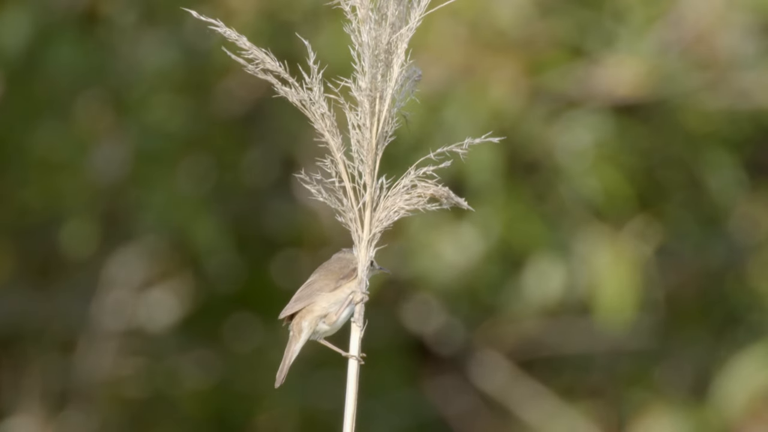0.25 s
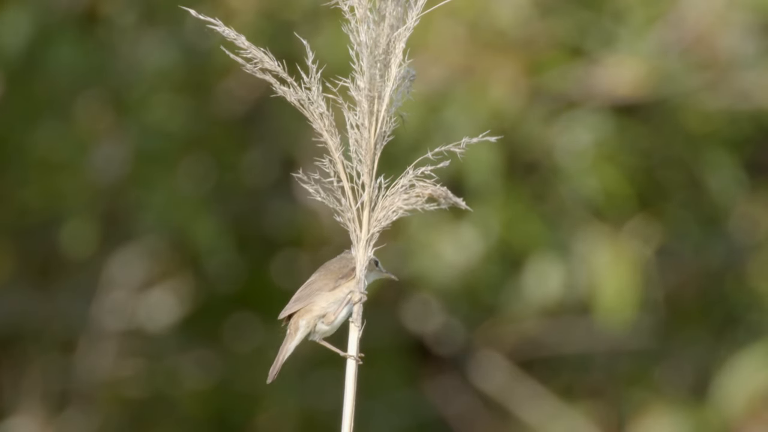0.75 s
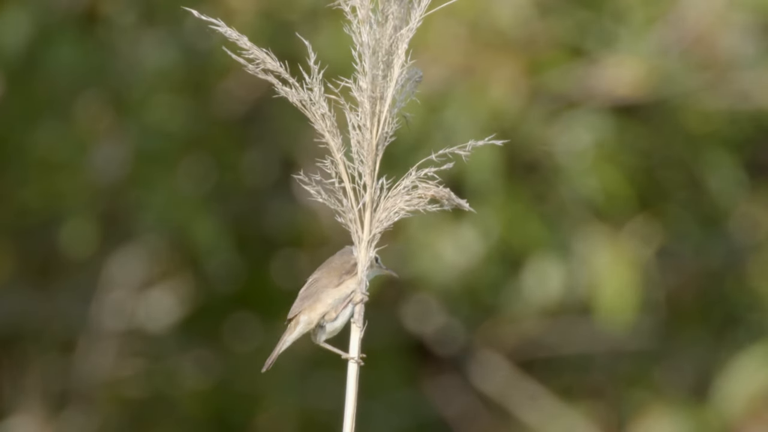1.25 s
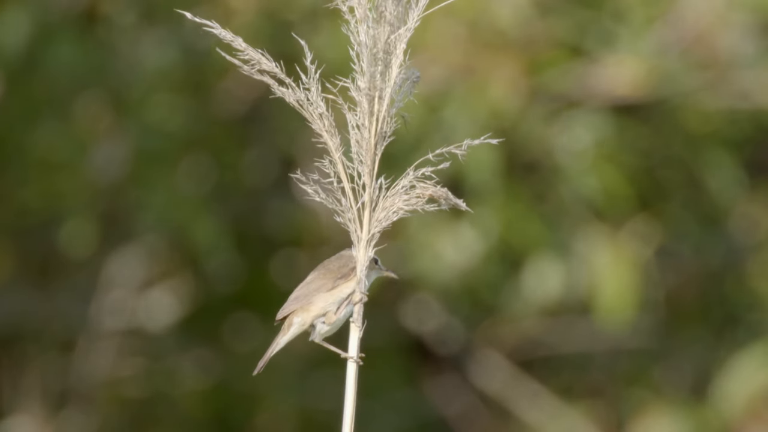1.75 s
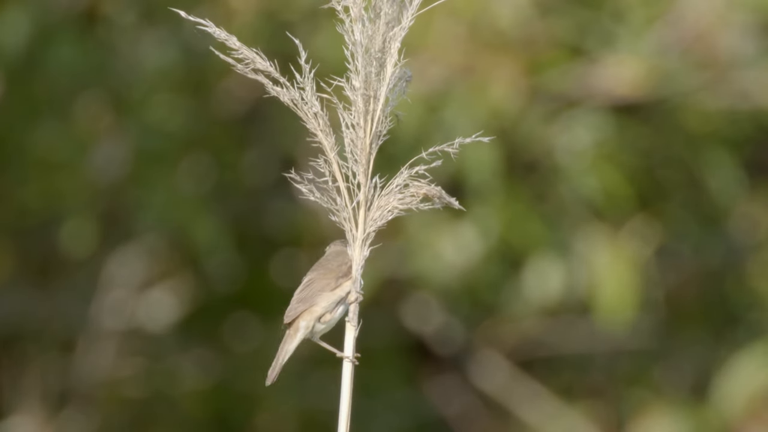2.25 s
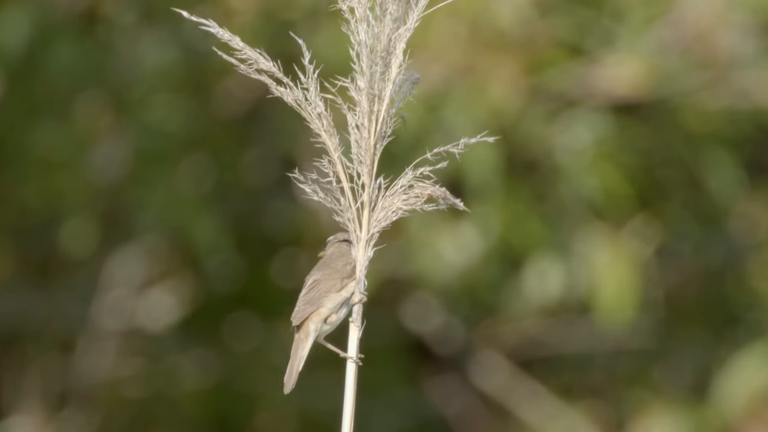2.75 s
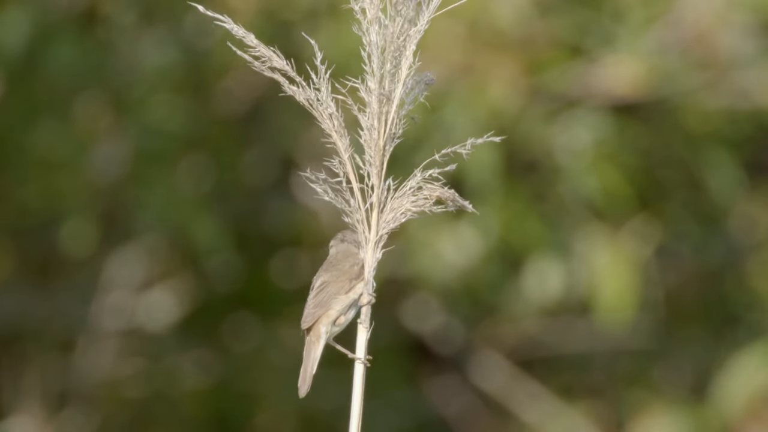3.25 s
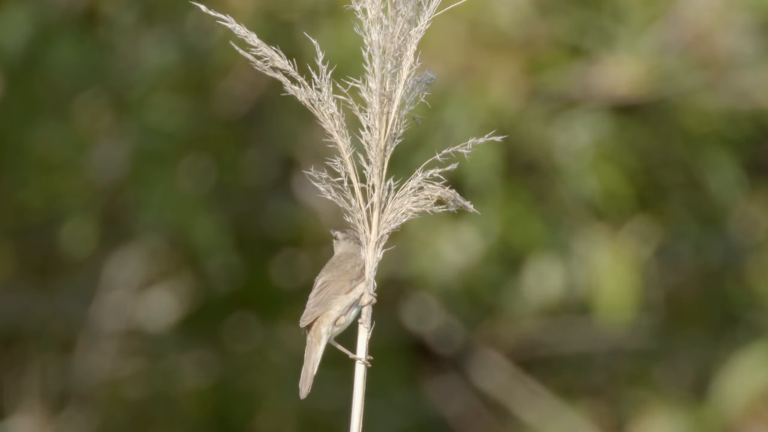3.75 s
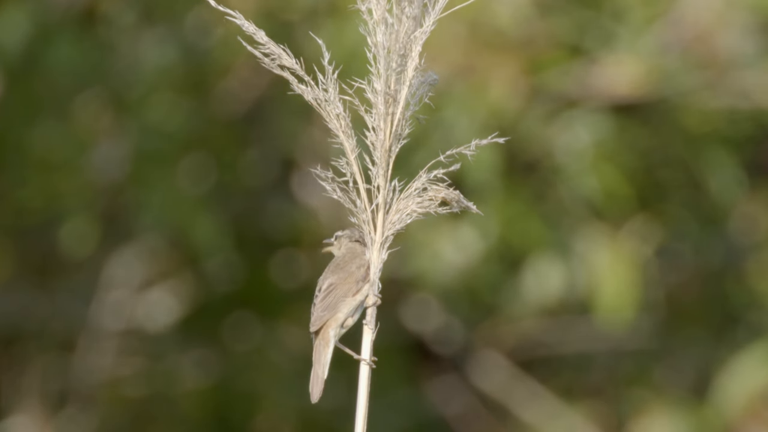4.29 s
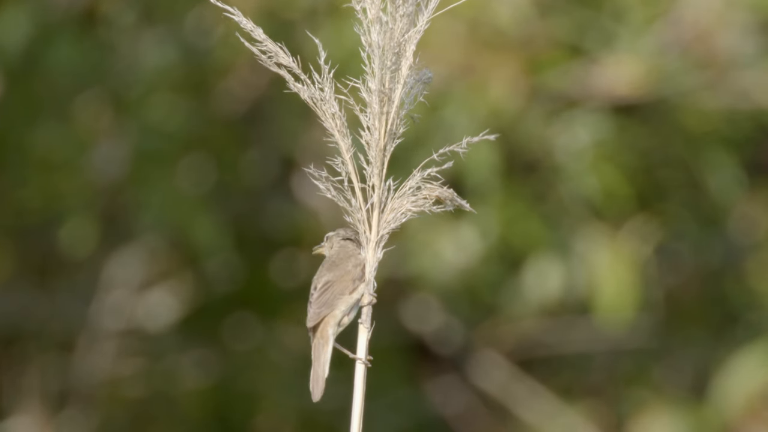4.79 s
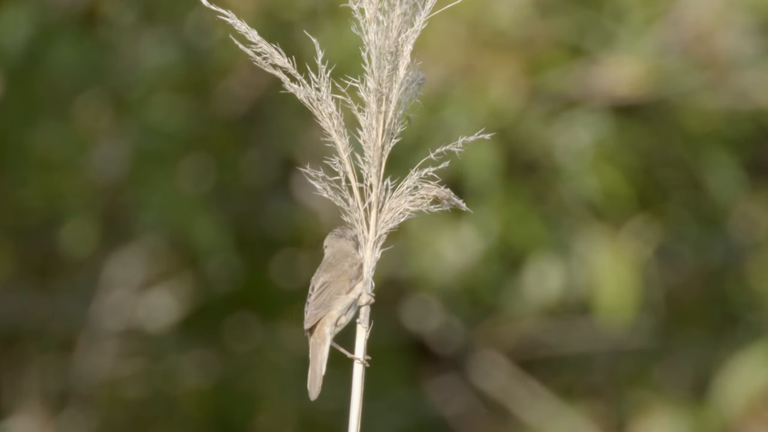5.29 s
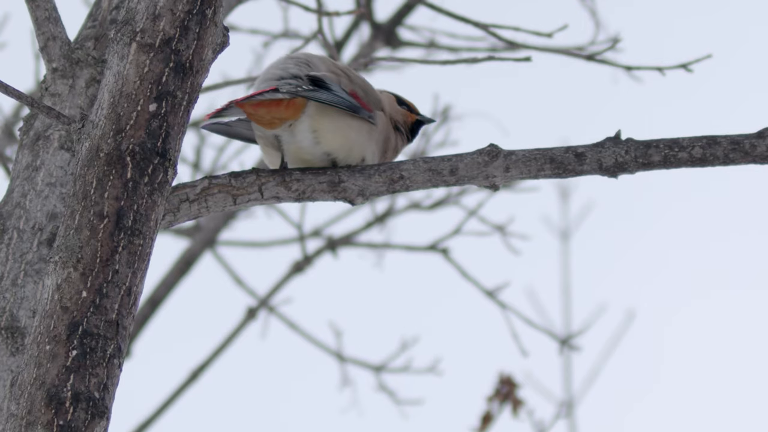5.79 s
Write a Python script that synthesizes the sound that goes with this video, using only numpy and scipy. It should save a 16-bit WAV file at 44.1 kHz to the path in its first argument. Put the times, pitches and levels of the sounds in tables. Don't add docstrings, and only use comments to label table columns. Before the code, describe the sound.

Outdoors in a reed bed, steady leafy hiss and faint throbbing insects lie under distant ticking, chattering birds. A close small bird warms up with soft arched notes, then sings short high paired chips. A far whistler swells a long low tone, flourishes and dives amid sharp tweets. Loud falling slurs follow in an even run, echoing off the foliage. At the very end it cuts to a quieter wood with a faint level whistle.

```python
import sys
import numpy as np
from scipy import signal
from scipy.fft import rfft, irfft
from scipy.io import wavfile
from scipy.ndimage import uniform_filter1d, minimum_filter1d

SR = 44100
rng = np.random.default_rng(int(sys.argv[2]) if len(sys.argv) > 2 else 0)


def transcribe(u):
    v = np.clip(np.atleast_2d(u).T, -1, 1)
    q = np.round(v * 32767).astype(np.int16)
    wavfile.write(sys.argv[1], SR, q)


def boost(x):
    u = np.asarray(x, float) / 20
    return 10 ** u


N = 265967
CUT_S = 5.703


def rms_one(x):
    return x / np.sqrt(np.mean(x ** 2) + 1e-20)


def drift(rate_hz):
    r = np.exp(-2 * np.pi * rate_hz / SR)
    wander = signal.lfilter([1], [1, -2 * r, r * r], rng.standard_normal(N + SR))
    return rms_one(wander[SR:])


def swell(t, start_s, length_s):
    return np.sin(np.pi * np.clip((t - start_s) / length_s, 0, 1))


def resonate(x, hz, width_hz):
    r = np.exp(-np.pi * width_hz / SR)
    feed = np.array([1, 0, -1]) * (1 - r * r) / 2
    return signal.lfilter(feed, [1, -2 * r * np.cos(2 * np.pi * hz / SR), r * r], x)


def add(out, start_s, hz, gain):
    turn = 2 * np.pi * np.cumsum(hz) / SR
    at = max(round(start_s * SR), 0)
    tone = np.sqrt(2) * gain * (np.sin(turn) + boost(-52.5) * np.sin(2 * turn))
    out[at:at + len(hz)] += tone[:N - at]


def sing(notes):
    out = np.zeros(N)
    for rows in notes:
        s, hz, level_db = np.transpose(rows)
        s = np.sort(s)
        t = np.arange(s[0], s[-1], 1 / SR)
        fade = np.clip(np.minimum(t - s[0], s[-1] - t) / 0.0034, 0, 1)
        pitch = uniform_filter1d(np.interp(t, s, hz), size=60)
        gain = uniform_filter1d(boost(np.interp(t, s, level_db)), size=40)
        add(out, s[0], pitch, fade * gain)
    return out


def repeat(calls, shape, vary_db):
    ms, share, shape_db = np.transpose(shape)
    vary = rng.standard_normal((len(calls), len(ms)))
    notes = []
    for (s, db, top_hz, *stretch), v in zip(calls, vary):
        times = s + ms * np.prod(stretch) / 1000
        notes.append(np.transpose([times, top_hz * share, db + shape_db + vary_db * v]))
    return sing(notes)


def pulsed(pulses, end_ms, glide, gap_db=-15):
    rows, ends = [], [p[0] for p in pulses[1:]] + [end_ms]
    for (start, peak, db), end in zip(pulses, ends):
        rise = [(start, u) for u in (0, .15, .4, .75, 1)]
        for edge, u in rise + [(end, .5)]:
            pulse_db = db + 20 * np.log10(np.sin(u * np.pi / 2) + 1e-3)
            rows.append((edge + u * (peak - edge), max(pulse_db, gap_db + db / 2)))
    ms, db = np.transpose([(rows[0][0] - 1, -34)] + rows + [(end_ms, -34)])
    return np.transpose([ms, np.interp(ms, *np.transpose(glide)), db])


TREELINE_S, TREELINE_SPREAD_S, TREELINE_DB = .088, .025, -5
SWAY_HZ, STILL_HZ = 7.0, 1.5


def echoes(x, near_db, far_db, near_t60=0.13, far_t60=0.9, gap_s=0.0091, sway_hz=SWAY_HZ):
    t, out = np.arange(SR) / SR, x.copy()
    sway = 2 * np.pi * sway_hz * np.arange(N) / SR + 2 * drift(sway_hz)
    for share in (np.sin(sway), np.cos(sway)):
        near = rng.standard_normal(SR) * boost(-60 * t / near_t60) * (t > gap_s)
        dull = signal.lfilter([1], [1, -.4], rng.standard_normal(SR))
        far = dull * boost(-60 * t / far_t60) * (1 - np.exp(-t / 0.00096))
        far *= 1 + boost(TREELINE_DB) * np.exp(-((t - TREELINE_S) / TREELINE_SPREAD_S) ** 2)
        reply = boost(near_db) * near / np.linalg.norm(near) + boost(far_db) * far / np.linalg.norm(far)
        out += signal.fftconvolve(x * share, reply)[:N]
    return out


def hiss(spectrum, patchy_db):
    hz, points = np.maximum(np.arange(N // 2 + 1) * SR / N, 1), np.array(spectrum)
    colour_db = np.interp(np.log(hz), np.log(points[:, 0]), points[:, 1])
    tone = rfft(rng.standard_normal(N)) * boost(colour_db)
    octave = np.clip(np.log2(hz / 62.5), 0, 8)
    level = np.std(irfft(tone * (hz > 600) * (hz < 1100), N))
    out = np.zeros(N)
    for k in range(9):
        band = irfft(tone * np.clip(1 - abs(octave - k), 0, 1), N)
        out += band * boost(patchy_db * drift(25) * (k < 7))
    return out / level


# (f/Hz, level/dB)
WOOD_COLOUR = [(18, -73), (30, -43), (287, -32), (600, -21), (740, -11.5), (1220, -13), (1390, -8),
               (1500, -7), (2480, -9.5), (5000, -26), (6200, -34.5), (16000, -40.5)]
# (t/s, f/Hz, level/dB)
WOOD_WHISTLE = [
    [(5.712, 1390, -46), (5.745, 1397, -48), (5.85, 1392, -47.5), (5.9, 1392, -58.5), (5.95, 1392, -46),
     (6.0, 1390, -42), (6.04, 1392, -43)],
]


def wood():
    return boost(-57) * hiss(WOOD_COLOUR, patchy_db=0.5) + sing(WOOD_WHISTLE)


# (f/Hz, level/dB)
REED_COLOUR = [(18, -60.5), (30, -44), (90, -37), (184, -30.5), (227, -24.5), (384, -15.5), (461, -11.5),
               (554, -12.5), (937, -3.5), (1810, -3), (2900, -1.5), (3400, -5), (3980, -5.5), (7090, -12),
               (14800, -17), (16000, -16)]
# (t/s, level/dB)
REED_LEVEL = [
    (0.0, -55),
    (4.43, -56),
    (5.7, -55),
]


def reeds():
    s, level_db = np.transpose(REED_LEVEL)
    return boost(np.interp(np.arange(N) / SR, s, level_db)) * hiss(REED_COLOUR, patchy_db=1.0)


# (start t/s, length/s, low f/Hz, high f/Hz, level/dB)
PUFFS = [
    (0.0, .4, 20, 90, -86),
    (0.545, 0.23, 294, 593, -59.5),
    (4.15, 0.59, 420, 594, -63),
]


def puffs():
    t, out = np.arange(N) / SR, np.zeros(N)
    for s, length, low_hz, high_hz, db in PUFFS:
        band = signal.butter(2, [low_hz, high_hz], "band", fs=SR, output="sos")
        out += boost(db) * swell(t, s, length) * rms_one(signal.sosfilt(band, rng.standard_normal(N)))
    return out


# (start t/s, length/s, f/Hz, level/dB)
DRONES = [
    (-.2, .35, 482, -63),
    (.9, 1.7, 482, -66),
    (4.1, .6, 482, -64),
    (-.2, .35, 352, -60),
    (4.9, .55, 352, -67),
    (.6, 2.6, 240, -83),
]


def drones():
    t, out = np.arange(N) / SR, np.zeros(N)
    for hz in (240, 482, 352):
        gain = boost(-87)
        for s, length, at_hz, db in DRONES:
            if at_hz == hz:
                gain = gain + boost(db) * swell(t, s, length)
        flutter = boost(5 * drift(14) - 2)
        pitch = hz + 13 * drift(15)
        out += gain * flutter * np.sqrt(2) * np.sin(2 * np.pi * np.cumsum(pitch) / SR)
    return out


# (f/Hz, width/Hz, level/dB, throb/dB)
INSECTS = [
    (2900, 540, -53.5, 3.5),
    (4500, 590, -63, 4.5),
]


def insects():
    out = np.zeros(N)
    for hz, width_hz, db, throb_db in INSECTS:
        throb = boost(db + throb_db * drift(45))
        scrape = resonate(resonate(rng.standard_normal(N), hz, width_hz), hz, width_hz)
        out += throb * rms_one(scrape)
    return out


# (t/s, f/Hz, level/dB)
CRICKET = [(0, 2920, -47), (.06, 2900, -52), (.13, 2780, -46), (.22, 2850, -55), (.3, 2900, -50),
           (.4, 2790, -50.5), (.56, 2900, -55)]


def cricket():
    return sing([CRICKET]) * drift(70)


# (t/s, f/Hz, level/dB)
SNAP = (3.3322, 9600, -27)


def snap():
    s, hz, db = SNAP
    click = np.zeros(N) + 1e-18
    click[round(s * SR)] = boost(db + 20)
    return resonate(resonate(click, hz, width_hz=1500), hz, width_hz=1500)


# (t/s, ticks per s)
FLOCK = [
    (0, 25),
    (.5, 40),
    (.7, 78),
    (1.4, 70),
    (1.7, 25),
    (2.4, 70),
    (3.0, 45),
    (5.7, 30),
]


def flock(level_db, low_hz=3500, high_hz=5100):
    out, draws = np.zeros(N), rng.random((600, 6))
    for at, keep, pitch, slope, length, size in draws:
        s = at * CUT_S
        if keep * 80 < np.interp(s, *np.transpose(FLOCK)):
            u = np.linspace(0, 1, int((0.0029 + 0.012 * length) * SR))
            middle_hz = low_hz + (high_hz - low_hz) * pitch
            hz = middle_hz * (1 + .6 * (slope - .3) * (u - .5))
            add(out, s, hz, boost(level_db + 3.7 * size) * np.sin(np.pi * u))
    return out


# (t/s, level/dB, f/Hz, length/s)
PIPS = [(-.001, -37.5, 4820, 0.011), (.212, -41, 4700, 0.0093), (.227, -40, 4800, .011),
        (0.243, -42, 2370, 0.019), (.245, -37, 4780, 0.017), (1.858, -41, 2950, 0.02),
        (2.24, -45, 4860, 0.021), (2.335, -41, 2500, 0.023), (2.597, -44, 5100, 0.0083),
        (2.485, -37.5, 4120, .01), (2.574, -48, 4530, 0.012), (2.414, -48, 4920, 0.0089),
        (0.638, -47, 2080, 0.032), (0.903, -44, 2140, .03), (1.062, -45, 4600, .008),
        (1.2, -40, 3680, 0.0073), (1.278, -42, 2250, 0.0081), (1.391, -47, 4580, .008),
        (1.417, -48, 4150, 0.008), (1.878, -42, 2750, .016), (2.404, -38, 2770, .009),
        (2.37, -40, 2890, 0.008), (2.156, -49, 2130, 0.031), (5.539, -43, 2900, 0.02),
        (5.575, -38.5, 3010, 0.017), (5.61, -34, 2976, 0.013), (5.644, -37.5, 2990, 0.023)]
# (t/s, level/dB, middle f/Hz, slashes)
GARGLES = [(5.018, -44, 4700, 3), (5.079, -39, 4700, 3), (5.137, -42, 4700, 3), (5.557, -36, 4300, 4),
           (5.64, -37.5, 4500, 4), (4.853, -41, 4800, 3), (4.905, -42, 4700, 3)]
SLASH_MS = (0, 6, 14, 24)
# (t/s, level/dB, middle f/Hz)
SLOW_RISES = [(1.311, -42, 2240), (.733, -46, 4480), (.925, -48, 4640), (1.797, -53, 2610),
              (2.383, -44, 4880), (2.634, -46, 2750), (2.843, -52, 5750), (2.936, -43, 4770),
              (3.006, -48, 5370), (3.092, -43, 4900), (3.184, -44, 5270), (3.2, -49, 2690)]
LOW_SAGS = [(3.903, -40.5, 2460), (3.992, -39.5, 2520), (4.077, -40.5, 2500)]
FLICKS = [(.773, -39, 4700), (.831, -42, 4500), (.869, -38, 4750), (.963, -38, 4700), (1.116, -35, 4730),
          (1.181, -37, 4000), (1.292, -34, 3920), (1.272, -47, 4000), (.563, -40.5, 4900),
          (.678, -41, 5100), (2.648, -32, 4140)]
SAGS = [(.287, -40, 5000), (.331, -39.5, 4960)]
FALLS = [(1.372, -45.5, 5740), (1.469, -47, 5850), (1.571, -47, 5740), (1.68, -51, 5830)]
DROOPS = [(5.213, -26, 3200), (5.252, -25, 3260), (5.323, -28, 3200), (5.366, -27, 3216)]
DOWN_TICKS = [(1.133, -38, 4820), (1.26, -36.5, 4600), (1.405, -41, 4640), (2.428, -41, 2550),
              (3.484, -42, 5000), (5.05, -47, 6900)]
UP_TICKS = [(1.567, -38, 3130), (1.806, -47, 2500), (2.47, -41, 2550), (4.485, -44, 4970)]
UP_STROKES = [(3.921, -39, 4300), (3.956, -38, 4400), (.877, -43, 3900), (1.114, -42, 4500),
              (3.017, -40, 4300), (3.164, -39, 4200), (1.243, -44, 4300), (1.859, -39, 3700),
              (1.871, -40, 3600), (1.916, -41, 3700), (2.556, -42, 4000), (4.091, -32, 4150),
              (4.128, -32, 4300), (4.269, -35, 4300), (4.305, -31, 4200), (5.04, -44, 5900)]
DOWN_STROKES = [(.826, -42, 4377), (3.034, -39, 4380), (3.183, -37, 4340), (5.0, -44, 4290)]
LONG_BENDS = [(4.558, -50, 7100)]
# (length/s, start and end pitch as share of the middle)
SLASH = (.0055, .76, 1.22)
SLOW_RISE = (0.0283, .94, 1.09)
LOW_SAG = (0.052, 1.12, 0.92)
FLICK = (0.0061, 0.944, 0.85)
SAG = (.028, 1.08, .97)
FALL = (.028, 1.03, .8)
DROOP = (.028, 1.05, .72)
DOWN_TICK = (.009, 1.05, .94)
UP_TICK = (.013, .92, 1.09)
UP_STROKE = (.009, .68, 1.28)
DOWN_STROKE = (.013, 1.22, .66)
LONG_BEND = (.06, 1.025, .93)


def chatter():
    out, flutter = np.zeros(N), drift(150)
    slashes = [(s + ms / 1000, db, hz) for s, db, hz, count in GARGLES for ms in SLASH_MS[:count]]
    kinds = [(slashes, SLASH), (SLOW_RISES, SLOW_RISE), (LOW_SAGS, LOW_SAG), (FLICKS, FLICK), (SAGS, SAG),
             (FALLS, FALL), (DROOPS, DROOP), (DOWN_TICKS, DOWN_TICK), (UP_TICKS, UP_TICK),
             (UP_STROKES, UP_STROKE), (DOWN_STROKES, DOWN_STROKE), (LONG_BENDS, LONG_BEND)]
    notes = [(s, db, hz, length, .98, 1.015) for s, db, hz, length in PIPS]
    notes += [(*row, *bend) for rows, bend in kinds for row in rows]
    for s, db, hz, length, start, end in notes:
        u = np.linspace(0, 1, int(max(length, .003) * SR))
        bend = np.polyval(np.polyfit([0, .5, 1], [start, 1, end], 2), u)
        level_db = db + 0.87 * flutter[int(abs(s) * SR):][:len(u)]
        add(out, s, hz * bend, boost(level_db) * np.sin(np.pi * u) ** 1.54)
    return out


# (t/s, level/dB, top f/Hz)
HOOKS = [(3.971, -34.5, 4830), (3.988, -32, 4620), (4.006, -34.5, 4610), (4.145, -35, 4710),
         (4.162, -32, 4580), (4.179, -30, 4380), (4.323, -28.5, 4500), (4.339, -24, 4370)]
RISES = [(.682, -42, 4800), (.701, -42, 4780), (.72, -47, 4630), (.764, -43, 3950), (.781, -41, 4150),
         (.802, -37, 3930), (.859, -44, 4100), (.875, -45, 4150), (.896, -39, 3900), (.955, -47, 4220),
         (.973, -40, 4130), (.993, -38, 4100), (1.055, -43, 4050), (1.074, -39, 4070), (1.092, -42, 3970),
         (1.158, -46, 3970), (4.355, -24, 4190), (4.497, -33, 4280), (4.516, -27.5, 4390),
         (4.535, -31, 3850), (4.54, -32, 4330)]
RATTLES = [(2.329, -45.5, 3500), (2.361, -46, 3520), (2.394, -46, 3430), (2.428, -41, 3440),
           (2.46, -41.5, 3480), (2.761, -44, 3580), (2.793, -45, 3520), (2.827, -46, 3480),
           (2.862, -44, 3490), (2.896, -41, 3460), (2.93, -43, 3200), (3.667, -43.5, 3610),
           (3.701, -44.5, 3530), (3.735, -45, 3490), (3.768, -44.5, 3500)]
# (ms from onset, pitch as share of top, level/dB)
HOOK_SHAPE = [(-1.5, .68, -16), (2, .82, -5), (5, .95, -1), (8, 1.0, 0), (11, .95, -4), (14, .78, -18)]
RISE_SHAPE = [(-1, .76, -18), (3, .87, -9), (6.5, .98, -1), (9.5, 1.01, 0), (13, .99, -18)]
RATTLE_SHAPE = [(-1, .88, -14), (4, .94, 0), (9, 1.01, -1), (12, 1.15, -5), (15, 1.32, -14)]


def second_bird():
    out = repeat(HOOKS, HOOK_SHAPE, vary_db=1.5) + repeat(RISES, RISE_SHAPE, vary_db=1.5)
    out += boost(2) * repeat(RATTLES, RATTLE_SHAPE, vary_db=1.5)
    answers = [(s + .013, db - 6, top_hz * .74) for s, db, top_hz in RATTLES]
    return out + repeat(answers, RATTLE_SHAPE, vary_db=2)


# (t/s, length/s, centre f/Hz, swing/Hz, level/dB)
WARBLES = [
    (5.052, .185, 6350, 230, -38),
]
TRILL_PER_S, TRILL_SLOWS = 49.5, 15


def warbles():
    out, wander = np.zeros(N), drift(30.4)
    for s, length, hz, swing_hz, db in WARBLES:
        t = np.arange(0, length, 1 / SR)
        swing = np.cos(2 * np.pi * (TRILL_PER_S - TRILL_SLOWS * t) * t)
        fade = np.clip(np.minimum(t / 0.007, (length - t) / 0.015), 0, 1)
        add(out, s, hz + swing_hz * swing, boost(db - 3.5 * swing + 1.5 * wander[:len(t)]) * fade)
    return out


# (t/s, level/dB, f/Hz at the loudest, stretch)
TWEETS = [
    (4.003, -18, 6696, 0.93),
    (4.189, -21.5, 6760, 1.1),
]
# (ms from onset, pitch share, level/dB)
TWEET_SHAPE = [(0, .93, -26), (2.5, .96, -4), (6, 1.0, 0), (9, 1.05, -3), (12, 1.14, -9), (15, 1.29, -18),
               (17, 1.41, -30)]
# (t/s, f/Hz, level/dB)
WHIP = [(5.474, 2950, -52), (5.476, 3540, -19.5), (5.479, 5520, -12), (5.482, 6350, -18.5),
        (5.486, 6870, -21.5), (5.491, 7330, -23.5), (5.497, 7700, -31), (5.501, 8050, -36)]
# (t/s, f/Hz, level/dB)
LAST_TWEET = [(5.626, 6120, -47), (5.63, 6240, -20), (5.633, 6510, -16.5), (5.637, 6990, -17),
              (5.639, 7500, -32), (5.645, 8000, -39)]


def third_bird():
    tweets = repeat(TWEETS, TWEET_SHAPE, vary_db=0.8) + sing([WHIP, LAST_TWEET])
    return echoes(tweets, near_db=-6.5, far_db=-10, near_t60=.08, far_t60=.48, gap_s=0.004)


def tweet_overtone():
    octaves = [(s, db - 29, 2 * hz, stretch) for s, db, hz, stretch in TWEETS]
    return repeat(octaves, TWEET_SHAPE, vary_db=0)


# (t/s, length/s, f/Hz, level/dB, swell/dB)
FLOURISH = [
    (4.023, 0.073, 1461, -17.5, 0.5),
    (4.141, .062, 2175, -17.5, 6),
]
OVERSHOOT_HZ, SETTLE_S, SETTLE_PER_S = 240, 0.013, 32
ATTACK_S, RELEASE_S = 0.0079, 0.0069


def flourish():
    out = np.zeros(N)
    for s, length, hz, db, swell_db in FLOURISH:
        t = np.arange(0, length, 1 / SR)
        overshoot_hz = OVERSHOOT_HZ * hz / FLOURISH[0][2]
        ring = overshoot_hz * np.exp(-t / SETTLE_S) * np.cos(2 * np.pi * SETTLE_PER_S * (t - .007))
        edge = np.clip(np.minimum(t / ATTACK_S, (length - t) / RELEASE_S), 0, 1) ** 2
        add(out, s, hz + ring, boost(db + swell_db * t / length) * edge)
    return out


# (t/s, f/Hz, level/dB)
HELD = [(2.86, 1376, -65), (2.888, 1360, -53), (3.13, 1302, -48.5), (3.524, 1314, -41.5), (3.75, 1324, -31),
        (3.92, 1320, -24), (3.968, 1298, -26), (3.978, 1280, -29), (3.986, 1230, -41)]
# (t/s, f/Hz, level/dB)
DIVE = [
    [(4.261, 3560, -43), (4.266, 3540, -28.5), (4.274, 3580, -22.5), (4.281, 3140, -22),
     (4.2845, 3030, -39.5)],
    [(4.2845, 2920, -37), (4.287, 2810, -15), (4.2895, 2570, -20.5), (4.293, 2360, -14.5),
     (4.305, 1843, -15), (4.316, 1520, -17), (4.33, 1198, -28.5), (4.352, 1028, -52)],
]


def whistler():
    out = echoes(sing([HELD]), near_db=-19, far_db=-24, sway_hz=STILL_HZ)
    out += echoes(flourish(), near_db=-11.5, far_db=-19.5, sway_hz=STILL_HZ)
    dive = sing(DIVE)
    thrown = resonate(dive, hz=3100, width_hz=1900)
    return out + dive - thrown + echoes(thrown, near_db=-6.5, far_db=-12.5, near_t60=0.077)


# (t/s, level/dB, top f/Hz, stretch)
ARCHES = [
    (1.702, -38, 4200, 1.0),
    (1.862, -40, 4150, .8),
    (1.918, -36, 4250, 1.0),
    (1.983, -31, 4250, 1.0),
    (2.064, -27.5, 4200, 1.05),
    (2.165, -28, 4050, 1.0),
]
# (ms from onset, pitch as share of top, level/dB)
ARCH_SHAPE = [(-1.5, .76, -14), (1, .86, -6), (3.5, 1.0, -3), (8, .98, 0), (13, .94, -1), (16, .88, -6),
              (18.5, .76, -18)]


def arches():
    return repeat(ARCHES, ARCH_SHAPE, vary_db=0.5)


# (t/s, level/dB, top f/Hz)
CHIPS = [(2.6041, -16, 4300), (2.7231, -13.5, 4274), (2.9277, -17, 4150), (3.0231, -15.5, 4250),
         (3.2098, -11.5, 4255), (3.3045, -10, 4304), (3.4986, -11.5, 4238), (3.6051, -11.5, 4256),
         (4.3415, -9.5, 4335), (4.4315, -7.5, 4293)]
# (start/ms, peak/ms, level/dB)
CHIP_PULSES = [
    (-1.76, 4.94, -0.5),
    (10.5, 20, -17.5),
]
# (ms from onset, pitch as share of top)
CHIP_GLIDE = [(-2.5, .86), (1.5, 1.0), (7, .995), (10.5, .94), (16, .93)]


def chips():
    return repeat(CHIPS, pulsed(CHIP_PULSES, 16, CHIP_GLIDE), vary_db=2.0)


# (t/s, level/dB, top f/Hz, stretch of the shape, first peak/ms)
SLURS = [
    (3.7899, -3.5, 4334, 0.89, 11.6),
    (4.5983, -2.5, 4357, 0.93, 10.7),
    (4.7708, -2.5, 4320, 0.97, 10),
    (4.9418, -1.5, 4324, 0.93, 8.8),
    (5.1157, -1.7, 4306, 0.96, 6.8),
    (5.2897, -1, 4365, 0.95, 8.7),
]
# (start/ms, peak/ms, level/dB)
SLUR_PULSES = [
    (-2, 11.5, -2),
    (17.5, 19, -4),
    (24.5, 32.6, -7.5),
    (39.5, 47, -18.5),
]
# (ms from onset, pitch as share of top)
SLUR_GLIDE = [(-2, .96), (1.5, 1.01), (10.5, .98), (31, .79), (44, .71), (58, .685)]
SLUR_END_MS = 53
FIRST_END_MS, END_PER_PEAK, HUSH_DB = 8.6, 0.62, -11.5
BANK_ECHO_S, BANK_ECHO_DB = 0.0093, -14


def slur_song():
    out, (first, second, *rest) = np.zeros(N), SLUR_PULSES
    for *call, peak in SLURS:
        hush = FIRST_END_MS + END_PER_PEAK * peak
        pulses = [(first[0], peak, first[2]), (hush, (hush + second[0]) / 2, HUSH_DB), second, *rest]
        out += repeat([call], pulsed(pulses, SLUR_END_MS, SLUR_GLIDE), vary_db=0.7)
    return out + boost(BANK_ECHO_DB) * np.roll(out, round(BANK_ECHO_S * SR))


def slurs_from_all_sides():
    softer = [(start, peak, db - 8.0) for start, peak, db in SLUR_PULSES]
    filled = pulsed(softer, SLUR_END_MS, SLUR_GLIDE, gap_db=-4)
    return repeat([row[:4] for row in SLURS], filled, vary_db=4.5)


def scene():
    near_bird = chips()
    slurs = slur_song()
    scattered = slurs_from_all_sides()
    near_bird += arches()
    second = second_bird()
    birds = echoes(near_bird, near_db=-14.5, far_db=-19.5)
    birds += slurs + echoes(scattered, near_db=-19, far_db=-16.5, near_t60=.1, far_t60=.75) - scattered
    birds += tweet_overtone()
    birds += whistler()
    birds += third_bird()
    birds += echoes(warbles(), near_db=-9, far_db=-13)
    far_off = chatter() + second + flock(level_db=-51.5) + cricket()
    birds += echoes(far_off, near_db=-12.5, far_db=-17.5)
    reed_bed = birds + snap() + reeds() + insects() + drones() + puffs()
    before = np.clip((CUT_S - np.arange(N) / SR) / 0.0029 + .5, 0, 1)
    return (before * reed_bed + (1 - before) * wood())[None]


def band_limit(x):
    return signal.sosfilt(signal.butter(12, 16620, fs=SR, output="sos"), x)


def record(dry):
    room_left = minimum_filter1d(np.minimum(1, 1.0 / (abs(dry) + 1e-9)), size=200)
    held = dry * uniform_filter1d(room_left, size=150)
    low_pass = signal.cheby2(16, 50, 16200, fs=SR, output="sos")
    return band_limit(signal.sosfilt(low_pass, held))


dry = scene()
out = record(dry)
transcribe(out)
```